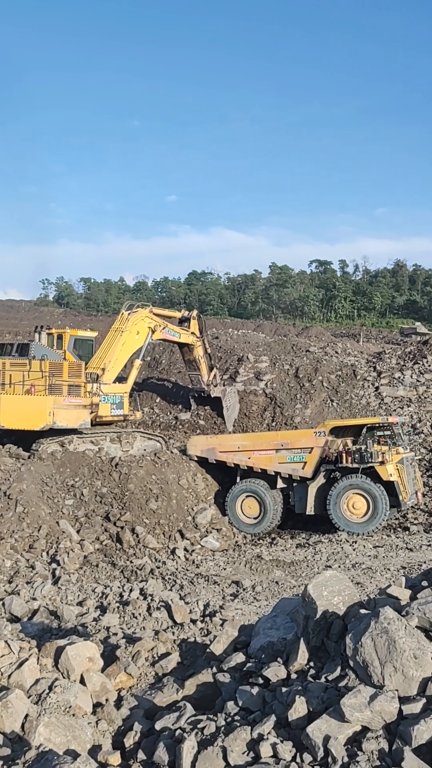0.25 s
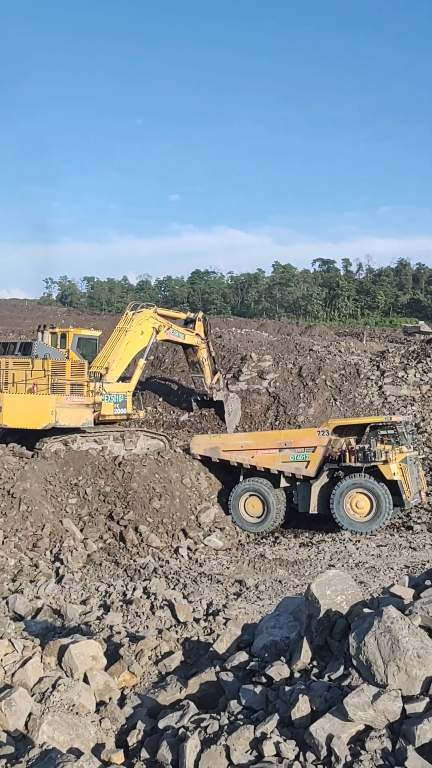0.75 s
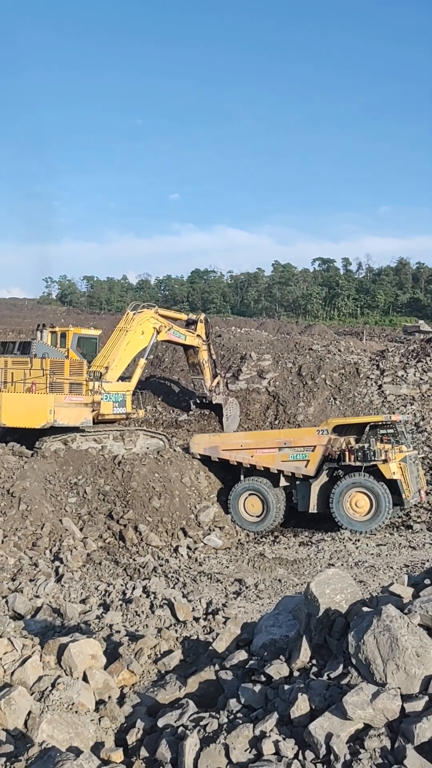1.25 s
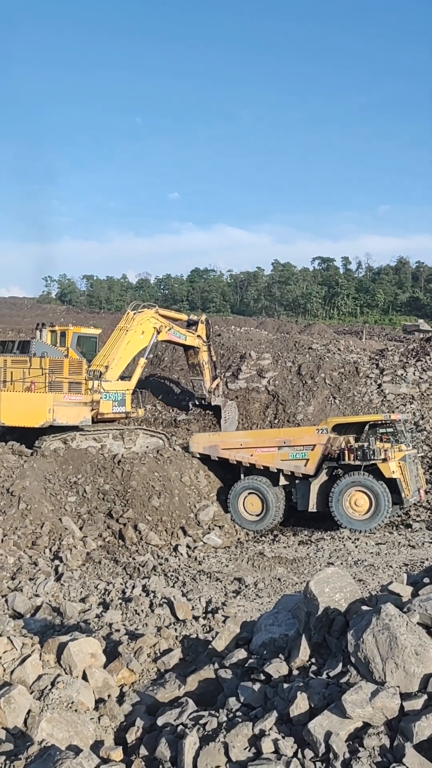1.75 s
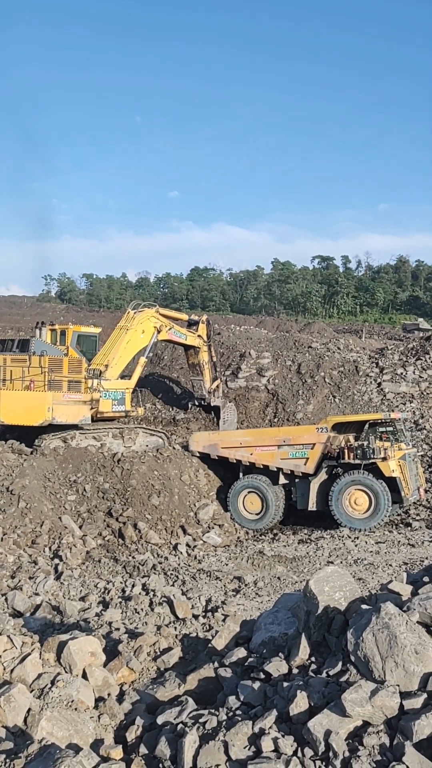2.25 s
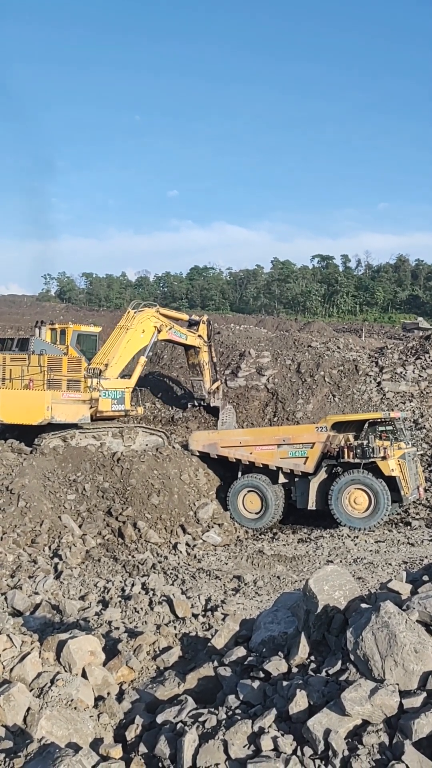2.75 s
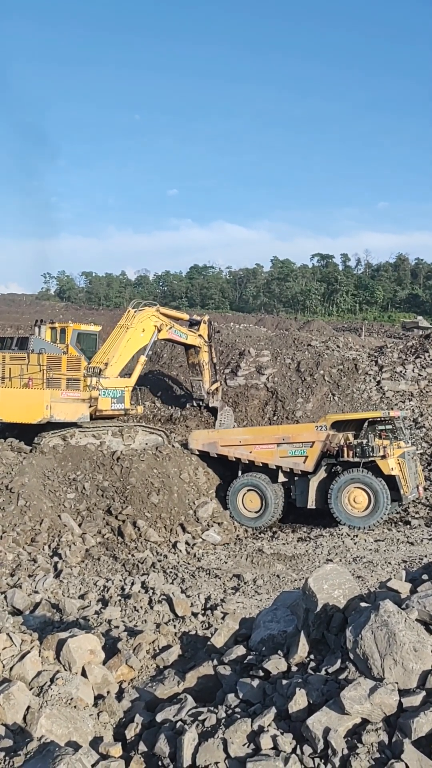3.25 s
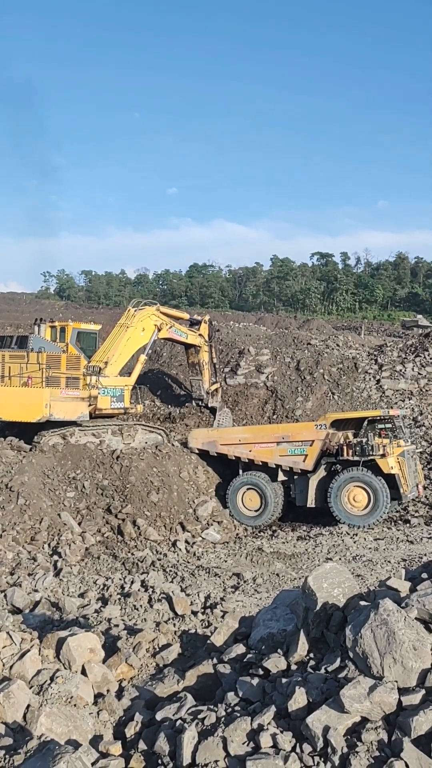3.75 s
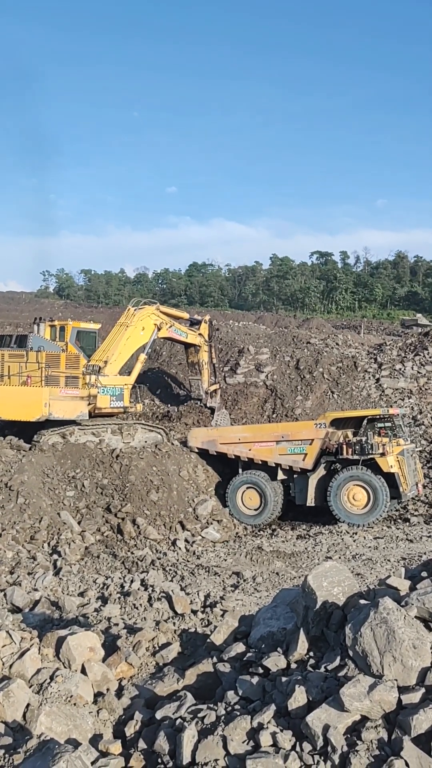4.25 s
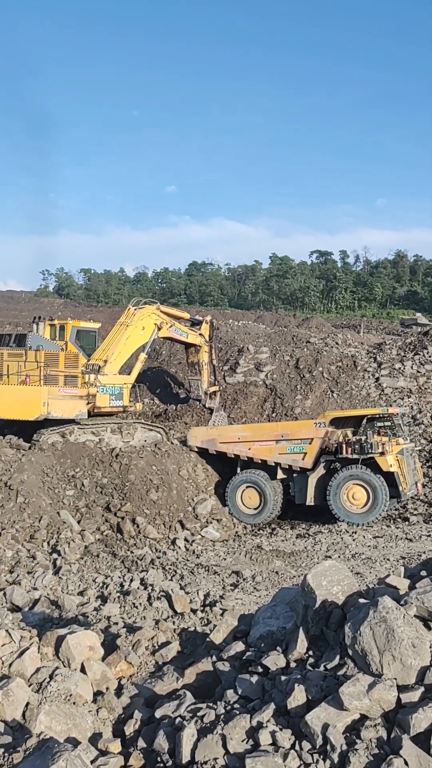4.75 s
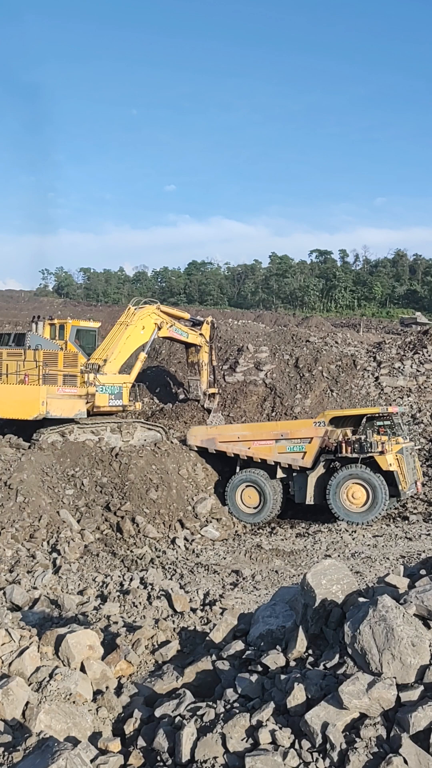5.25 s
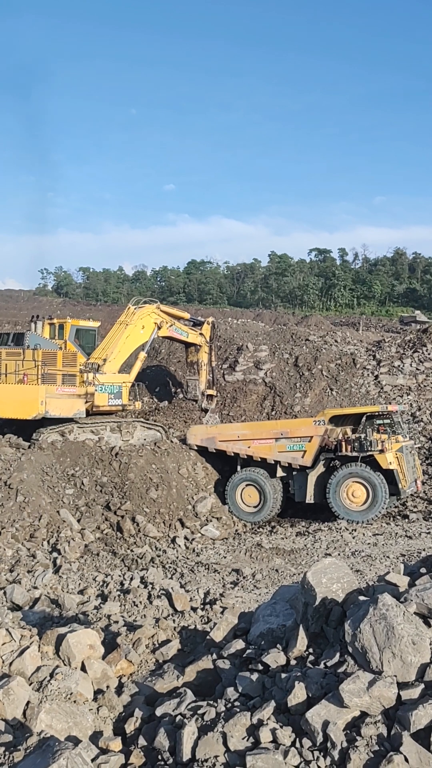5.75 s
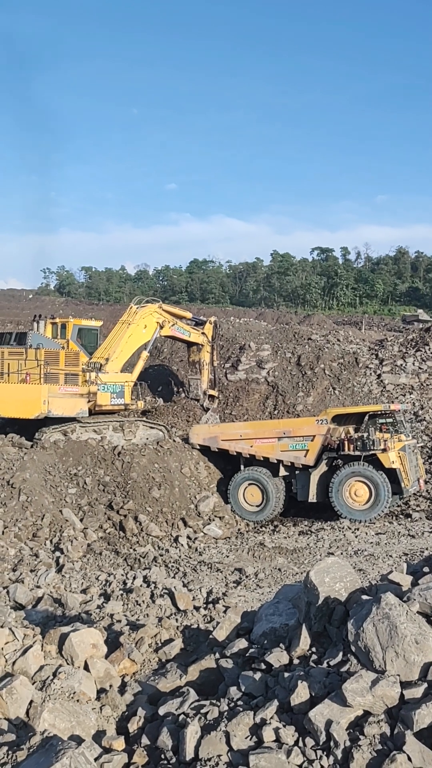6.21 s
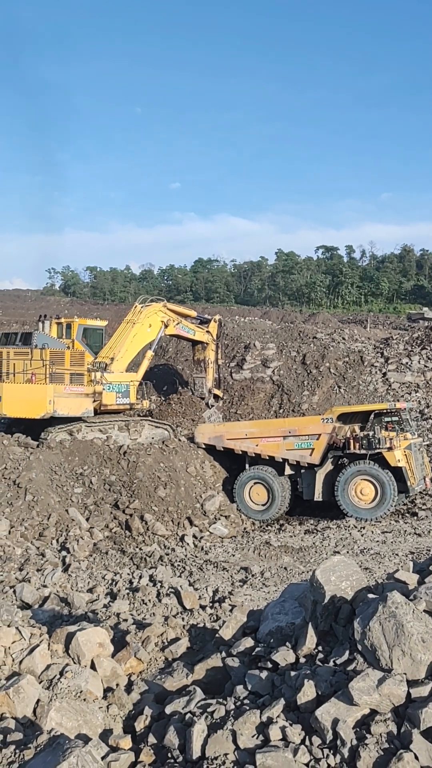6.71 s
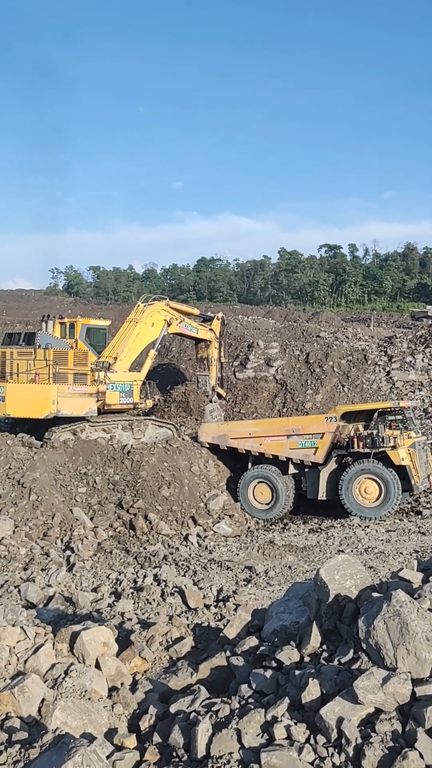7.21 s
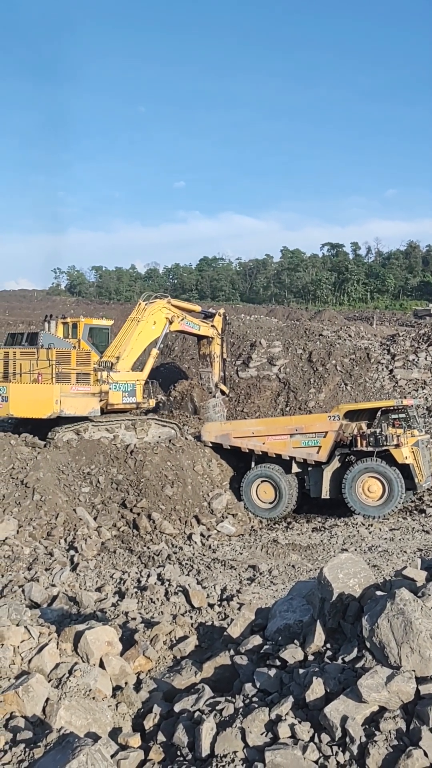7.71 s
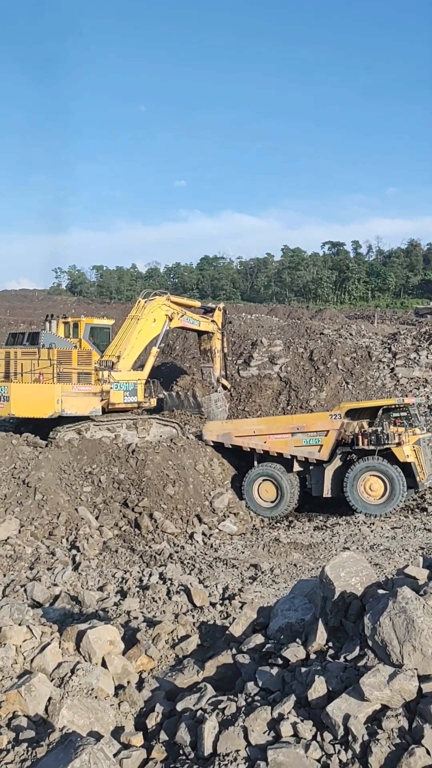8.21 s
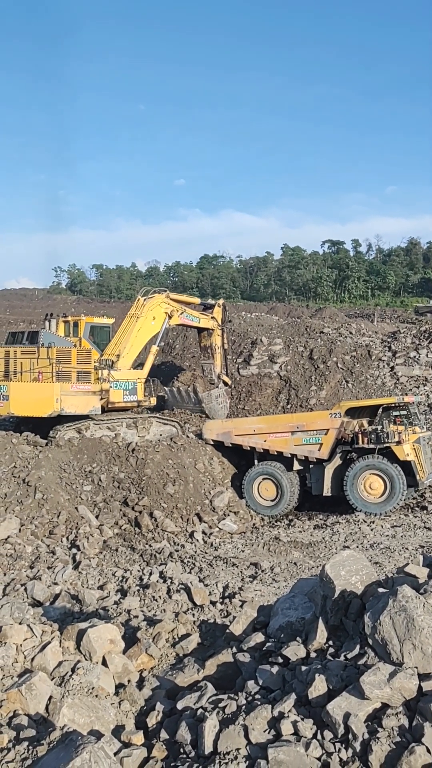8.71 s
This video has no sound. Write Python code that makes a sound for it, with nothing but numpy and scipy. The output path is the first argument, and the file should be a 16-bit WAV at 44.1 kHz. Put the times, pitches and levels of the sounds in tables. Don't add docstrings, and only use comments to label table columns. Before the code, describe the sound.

Across an open rocky pit, a large diesel excavator and a waiting dump truck drone continuously. The low note starts quieter at high speed, swells at once and sags under load, beating as the engines slip out of step. Hydraulic whine comes and goes. A short gritty crack of bucket on rock lands at about two seconds; later the engine races briefly, then bogs down again. One distant outdoor phone microphone, no other events.

```python
import sys
import numpy as np
from scipy import signal
from scipy.fft import rfft, irfft, next_fast_len
from scipy.io import wavfile

SR = 44100
rng = np.random.default_rng(int(sys.argv[2]) if len(sys.argv) > 2 else 0)


def generate_wav(signal):
    frames = np.transpose(np.atleast_2d(signal))
    scaled = np.clip(frames, -1, 1) * 32767
    pcm = np.round(scaled).astype(np.int16)
    wavfile.write(sys.argv[1], SR, pcm)


def level_to_linear(level):
    exponent = np.asarray(level, float) / 20
    return 10 ** exponent


N = 395577
TIME = np.arange(N) / SR
WORK_RPM = 1640

# t/s, speed/rpm
DIGGER_SPEED = [(0, 1815), (.12, 1805), (.32, 1664), (1.35, 1612), (2.3, 1586), (2.8, 1655), (3.6, 1612),
                (4.05, 1650), (5.74, 1656), (6.1, 1825), (6.33, 1853), (6.62, 1818), (6.9, 1722),
                (7.25, 1680), (7.55, 1598), (8.45, 1634), (8.82, 1798), (8.97, 1815)]
# t/s, level/dB
DIGGER_EFFORT = [(0, -33), (.12, -21.5), (.4, -24.5), (.83, -21.5), (1.01, -18), (1.93, -16.5), (2.4, -21),
                 (3.6, -20.5), (4.5, -22.5), (5.6, -21.5), (6.1, -29), (6.7, -27), (7.45, -20.5),
                 (8.5, -23), (8.82, -25.5), (8.97, -28.5)]
# t/s, depth/dB, half length/s
BEAT_DIPS = [(.3, 3.5, 0.11), (1.1, 2.2, 0.083), (1.506, 4.5, 0.065), (1.665, 5, 0.072),
             (1.844, 4.5, 0.076), (2.02, 6.5, .11), (2.27, 3.5, 0.15), (2.57, 3.5, .13), (2.807, 3, 0.085),
             (3.004, 4.5, .13), (3.32, 4, .17), (3.772, 4, 0.1), (3.996, 2.5, 0.08), (4.21, 3.5, 0.074),
             (4.38, 4.5, 0.07), (4.591, 13, 0.059), (4.748, 16, 0.038), (4.96, 3.5, 0.084),
             (5.246, 7.5, 0.12), (5.448, 6.5, .12), (5.683, 5, .08), (5.89, 4.5, 0.16), (6.426, 2, .22),
             (6.836, 6.5, 0.18), (7.069, 3.5, 0.14), (7.376, 3.5, 0.11), (7.54, 6, 0.056),
             (7.707, 6, 0.086), (8.04, 4, .22), (8.684, 9, 0.18)]
# multiple of shaft speed, level/dB
DIGGER_NOTES = [(8.55, -56), (9, -53), (12, -60), (14.25, -52), (21.4, -55), (25.65, -58), (28.5, -60),
                (34.2, -61)]
# start t/s, end t/s, level/dB
PUMP_STROKES = [
    (1.26, 2.56, -38.5),
    (2.502, 3.128, -42.5),
    (3.323, 3.885, -36),
    (4.027, 4.92, -42),
    (5.148, 5.85, -43.5),
    (6.017, 6.22, -37),
    (6.262, 6.704, -39.5),
    (6.85, 7.182, -41),
    (7.332, 8.4, -41.5),
]
# t/s, speed/rpm
TRUCK_SPEED = [(0, 1800), (.35, 1772), (1.0, 1644), (1.3, 1624), (2.2, 1591), (2.6, 1598), (3.3, 1634),
               (3.8, 1614), (4.2, 1620), (4.9, 1646), (5.9, 1636), (6.4, 1697), (6.8, 1741), (7.25, 1712),
               (7.8, 1613), (8.4, 1610), (8.97, 1645)]
# t/s, level/dB
TRUCK_EFFORT = [(0, -37.5), (.6, -39), (1.0, -33), (1.3, -32), (3.3, -34), (3.6, -36.5), (4.2, -36),
                (5.9, -37), (6.4, -43), (7.25, -44.5), (7.6, -36), (8.0, -34.5), (8.97, -39.5)]
# multiple of shaft speed, level/dB
TRUCK_NOTES = [(12, -55), (16, -58), (20, -52), (24, -57)]
# t/s, level/dB, time to fall 60 dB/s, brightness/(dB per octave)
CRACK_HITS = [
    (2.0345, -35, .06, 4),
    (2.039, -35, .14, 0),
    (2.074, -40, .14, -1),
]
# f/Hz, level/dB (per Hz)
CRACK_COLOUR = [(500, -10), (900, 2), (1300, 2.5), (2000, 1), (2800, -4), (3800, -8), (5400, -18.5),
                (7500, -25), (8300, -56.5)]
# t/s, slip rate/Hz, level/dB
JUDDER = [(2.034, 326, -70), (2.036, 324, -36), (2.044, 315, -33), (2.056, 308, -32), (2.064, 305, -38),
          (2.07, 305, -46), (2.09, 303, -48)]
# start t/s, end t/s, start f/Hz, end f/Hz, level/dB
GROANS = [(1.55, 1.85, 94, 94, -39), (4.35, 4.75, 91, 91, -38), (7.75, 8.2, 90, 94, -39),
          (6.1, 6.85, 304, 309, -43), (6.85, 7.35, 306, 303, -44), (4.93, 5.05, 378, 395, -38.5),
          (5.6, 7.35, 578, 574, -47), (3.8, 4.5, 583, 590, -49), (2.6, 3.1, 586, 588, -50),
          (7.3, 7.75, 384, 380, -45), (6.8, 7.3, 404, 398, -47), (6.1, 6.8, 264, 258, -46),
          (6.7, 7.6, 348, 334, -47), (0, .6, 360, 348, -45), (4.8, 6.0, 548, 546, -50),
          (3.85, 4.6, 702, 706, -51)]
# t/s, f/Hz, level/dB
FAR_ENGINE = [(0, 180, -46), (.6, 175, -37.5), (2.1, 163, -45), (3, 161, -45), (4.6, 160.4, -42),
              (5.8, 161.8, -40), (6.15, 164.3, -35.5), (6.6, 168, -35.5), (6.85, 169, -44), (7.7, 163, -46),
              (8.5, 163.2, -44), (8.75, 164.3, -34), (8.97, 165.2, -33)]
# f/Hz, level/dB (per Hz)
RUMBLE_COLOUR = [(20, -42), (48, -25.5), (61, -18), (70, -17.5), (77, -2), (125, -0.5), (140, 2), (190, 5),
                 (240, -4), (300, -0.5), (440, -5.5), (580, -3.5), (650, -13.5), (900, -32)]
# f/Hz, level/dB (per Hz)
ROAR_COLOUR = [(400, -21), (650, -1.5), (820, -1.5), (1000, 0), (1400, -3.5), (1900, -11), (2600, -12.5),
               (3500, -21.5), (5000, -28.5), (6500, -37.5), (7450, -35.5), (7780, -47), (8000, -55.5),
               (8700, -77)]


def rms_one(x):
    return x / np.sqrt(np.mean(x ** 2) + 1e-20)


def in_time(rows):
    s, *columns = np.transpose(rows)
    return [np.interp(TIME, s, column) for column in columns]


def drift(rate):
    step, settle = 40, 2000
    r = np.exp(-2 * step * np.pi * rate / SR)
    coarse = rng.standard_normal(N // step + settle + 2)
    slow = signal.lfilter([1], [1, -2 * r, r * r], coarse)[settle:]
    return np.interp(np.arange(N) / step, np.arange(len(slow)), rms_one(slow))


def note(turns, level_db, wobble, flutter_db):
    phase = 2 * np.pi * (turns + rng.random()) + wobble * drift(6)
    gain = level_to_linear(level_db + flutter_db * drift(6.8))
    return np.sqrt(2) * gain * np.sin(phase)


def noise_bands(spectrum, source=None):
    size = next_fast_len(N)
    hz = np.maximum(np.arange(size // 2 + 1) * SR / size, 1)
    corner_hz, level_db = np.transpose(spectrum)
    colour = level_to_linear(np.interp(np.log(hz), np.log(corner_hz), level_db, right=-120))
    flat = rng.standard_normal(size) if source is None else source
    coloured = rfft(flat, size) * colour / np.sqrt(np.mean(colour ** 2))
    for centre in 18 * 2 ** np.arange(0, 9.1, .5):
        share = np.clip(1 - 2 * np.abs(np.log2(hz / centre)), 0, 1)
        if np.max(share * colour) > 1e-3:
            yield centre, irfft(coloured * share, size)[:N]


def digger(turns, rpm):
    firing_db, = in_time(DIGGER_EFFORT)
    for s, depth_db, half_s in BEAT_DIPS:
        firing_db = firing_db - depth_db * np.clip(1 - np.abs(TIME - s) / half_s, 0, 1)
    third_db = -42 + 0.015 * (rpm - WORK_RPM)
    uneven = 1 + .05 * drift(30)
    out = uneven * note(6 * turns, firing_db, wobble=.08, flutter_db=.1)
    out += note(3 * turns, third_db, wobble=.25, flutter_db=1.2)
    out += pump_level() * note(17.1 * turns, 0, wobble=.25, flutter_db=.6)
    for multiple, level_db in DIGGER_NOTES:
        out += note(multiple * turns, level_db, wobble=.8, flutter_db=2.5)
    return out


def pump_level():
    idle_db, ramp_s = -55.5, .1
    level = np.full(N, level_to_linear(idle_db))
    for start, end, level_db in PUMP_STROKES:
        ramp = np.clip(np.minimum(TIME - start, end - TIME) / ramp_s, 0, 1)
        level = np.maximum(level, level_to_linear(level_db) * ramp ** 2)
    return level


def truck(rpm):
    firing_db, = in_time(TRUCK_EFFORT)
    bank_db = -40 - 0.049 * (rpm - WORK_RPM)
    turns = np.cumsum(rpm / 60) / SR
    out = note(8 * turns, firing_db, wobble=.2, flutter_db=.7)
    out += note(4 * turns, bank_db, wobble=.25, flutter_db=1.2)
    for multiple, level_db in TRUCK_NOTES:
        out += note(multiple * turns, level_db, wobble=.8, flutter_db=2.5)
    return out


def crack():
    first = round(CRACK_HITS[0][0] * SR)
    span = slice(first, first + SR // 2)
    out = grit(span)
    out[span] += judder_buzz(span)[span]
    return out


def grit(span):
    out = np.zeros(N)
    for hz, band in noise_bands(CRACK_COLOUR):
        quick = (hz / 2000) ** .5
        for s, level_db, t60, tilt_db in CRACK_HITS:
            age = np.maximum(TIME[span] - s, 0)
            rise = 1 - np.exp(-age * quick ** 2 / .0015)
            fall_db = 60 * age * quick / t60
            out[span] += band[span] * rise * level_to_linear(level_db + tilt_db * np.log2(hz / 2000) - fall_db)
    return out


def judder_buzz(span):
    per_s, slip_db = in_time(JUDDER)
    slips = np.diff(np.floor(np.cumsum(per_s) / SR), prepend=0) * np.sqrt(SR / per_s)
    slips *= level_to_linear(slip_db + 1.7 * rng.standard_normal(N))
    slips *= (TIME > JUDDER[0][0]) * (TIME < JUDDER[-1][0])
    buzz = sum(band / (1 + (hz / 5000) ** 2) for hz, band in noise_bands(CRACK_COLOUR, slips))
    for lag_s in (.0007, .0013):
        loop = np.r_[1, np.zeros(round(lag_s * SR) - 1), .5]
        buzz[span] = signal.lfilter(loop[::-1], loop, buzz[span])
    return buzz


def groans():
    out = np.zeros(N)
    for start, end, start_hz, end_hz, level_db in GROANS:
        swell = np.sin(np.pi * np.clip((TIME - start) / (end - start), 0, 1)) ** .5
        hz = np.interp(TIME, [start, end], [start_hz, end_hz])
        out += swell * note(np.cumsum(hz) / SR, level_db, wobble=1.2, flutter_db=1.5)
    return out


def far_machines():
    hz, level_db = in_time(FAR_ENGINE)
    whine_hz, whine_db = 1049, -54.5
    engine = note(np.cumsum(hz) / SR, level_db, wobble=.3, flutter_db=1.2)
    return engine + note(whine_hz * TIME, whine_db, wobble=.45, flutter_db=2.2)


def exhaust_rumble(truck_racing, racing):
    rumble = sum(level_to_linear(.5 * drift(4)) * band for hz, band in noise_bands(RUMBLE_COLOUR))
    level_db = -32 + 0.0064 * racing + 0.0127 * truck_racing
    return level_to_linear(level_db) * rumble


def fan_roar(turns, truck_racing):
    throb_db = .4 * np.cos(2 * np.pi * turns) + .3 * np.cos(12 * np.pi * turns) + .3 * drift(15)
    tilt_db = 0.0007 * truck_racing
    roar = np.zeros(N)
    for hz, band in noise_bands(ROAR_COLOUR):
        octaves = np.log2(hz / 1400)
        throb_share = np.clip(hz / 3000, 0, 1.3)
        roar += level_to_linear(tilt_db * octaves + throb_db * throb_share + .25 * drift(3)) * band
    return level_to_linear(-39.5 + 0.0074 * truck_racing) * roar


def scene():
    (rpm,), (truck_rpm,) = in_time(DIGGER_SPEED), in_time(TRUCK_SPEED)
    turns = np.cumsum(rpm / 60) / SR
    racing, truck_racing = rpm - WORK_RPM, truck_rpm - WORK_RPM
    engines = digger(turns, rpm) + truck(truck_rpm) + far_machines()
    noise = exhaust_rumble(truck_racing, racing) + fan_roar(turns, truck_racing)
    return (engines + crack() + groans() + noise)[None]


def low_pass(x):
    return signal.sosfilt(signal.butter(12, 8420, fs=SR, output="sos"), x)


def record(dry):
    hiss = level_to_linear(-97) * rng.standard_normal(dry.shape)
    return low_pass(dry + hiss)


dry = scene()
out = record(dry)
generate_wav(out)
```